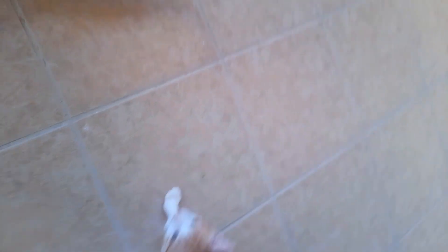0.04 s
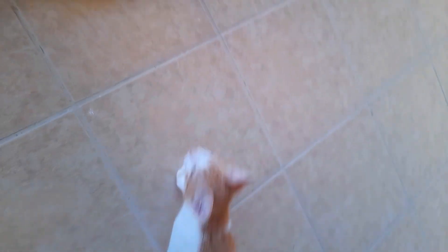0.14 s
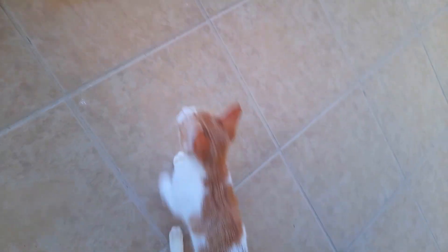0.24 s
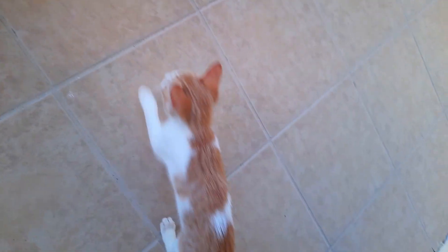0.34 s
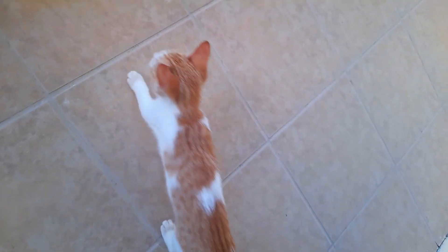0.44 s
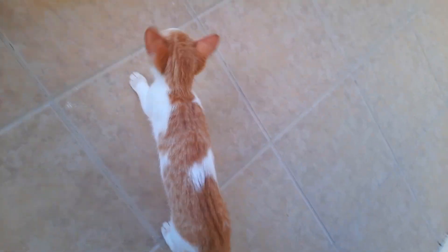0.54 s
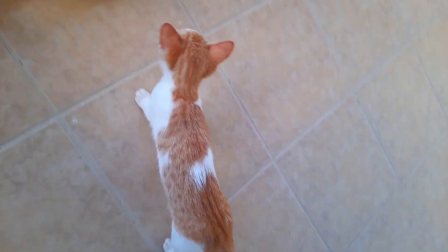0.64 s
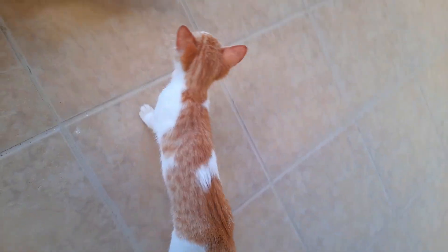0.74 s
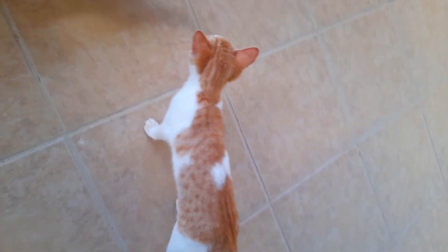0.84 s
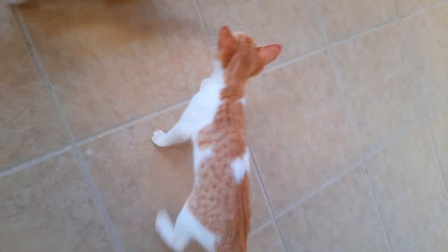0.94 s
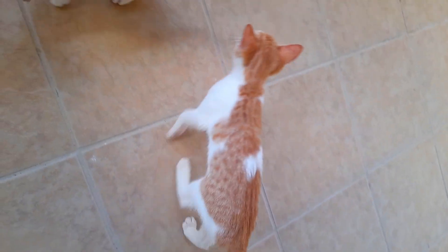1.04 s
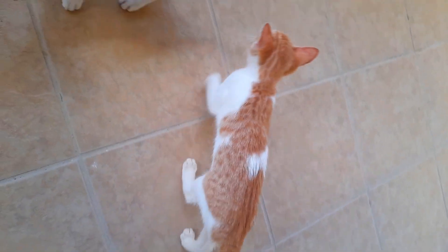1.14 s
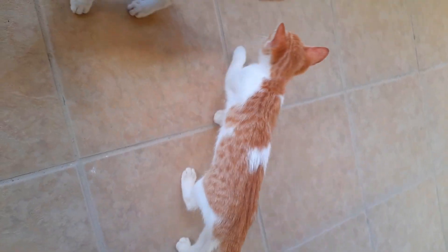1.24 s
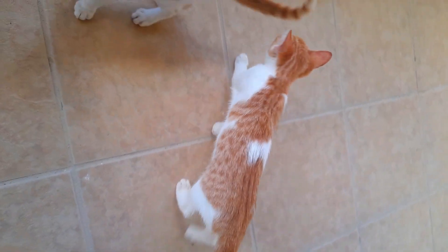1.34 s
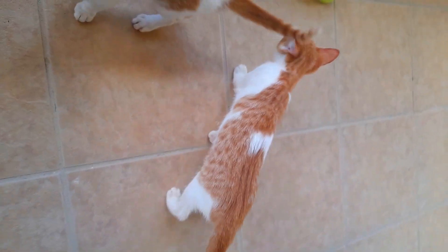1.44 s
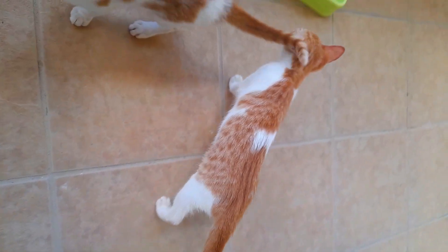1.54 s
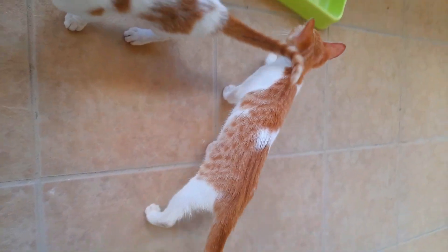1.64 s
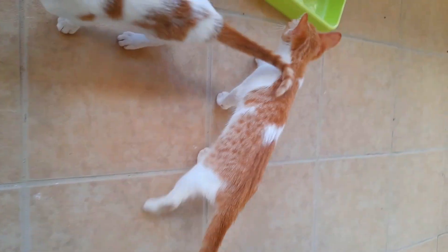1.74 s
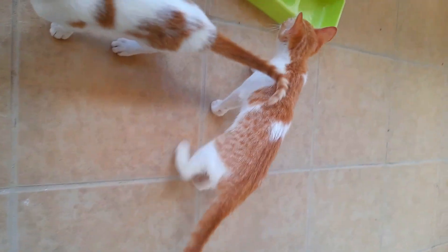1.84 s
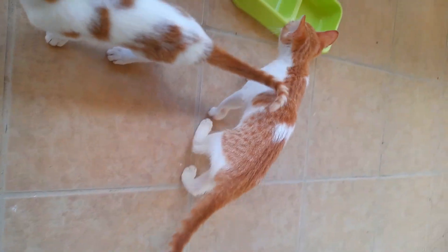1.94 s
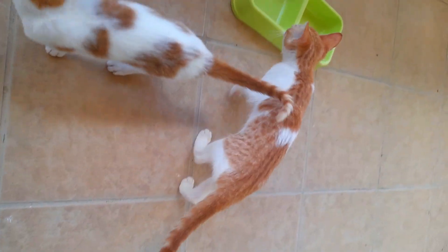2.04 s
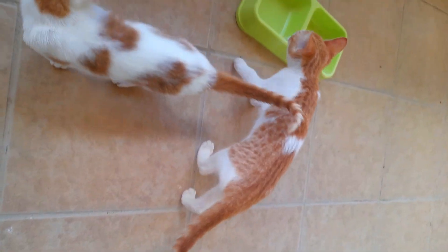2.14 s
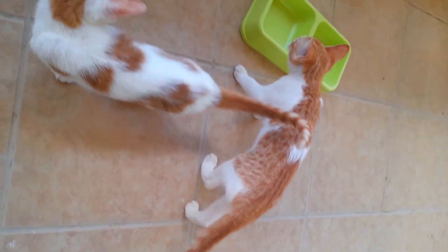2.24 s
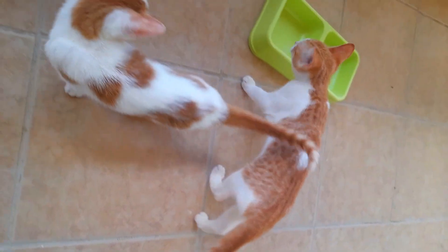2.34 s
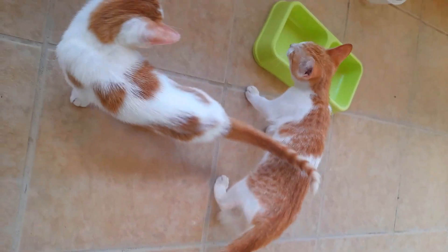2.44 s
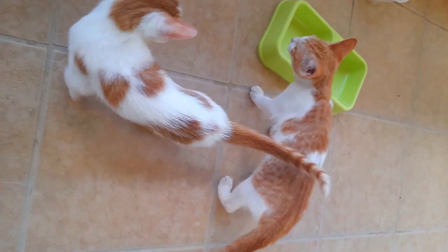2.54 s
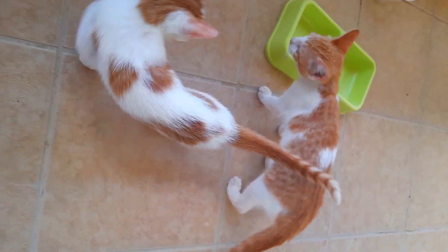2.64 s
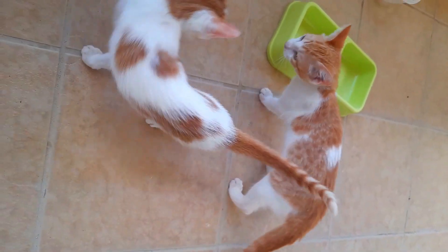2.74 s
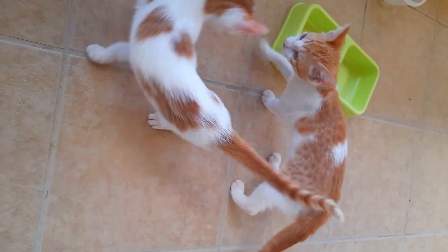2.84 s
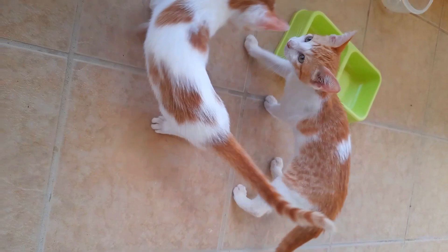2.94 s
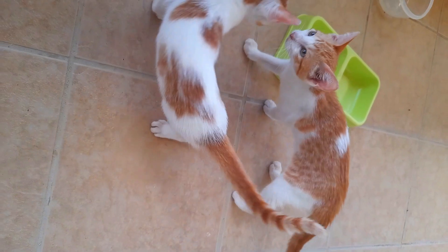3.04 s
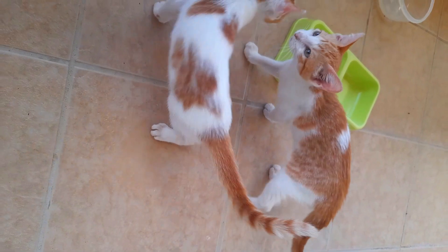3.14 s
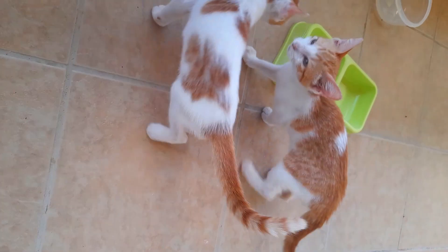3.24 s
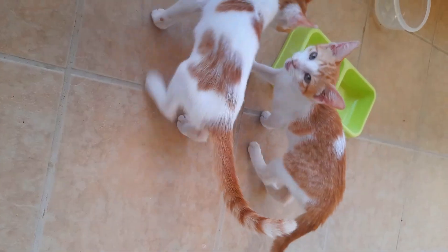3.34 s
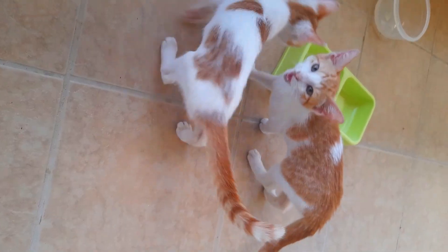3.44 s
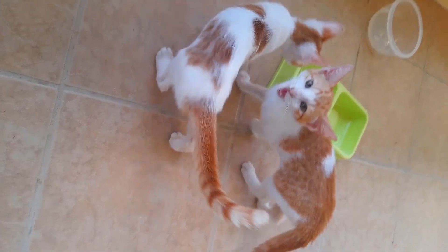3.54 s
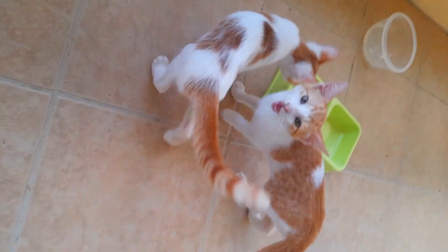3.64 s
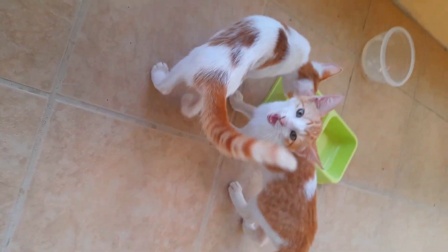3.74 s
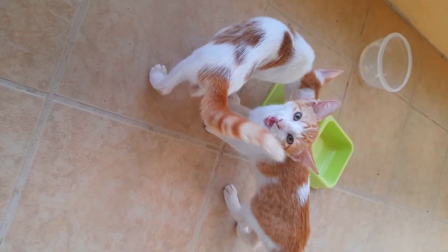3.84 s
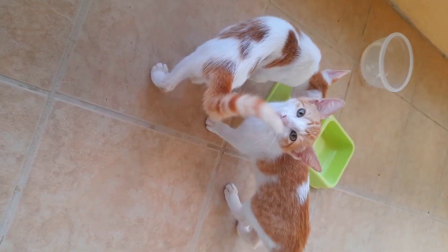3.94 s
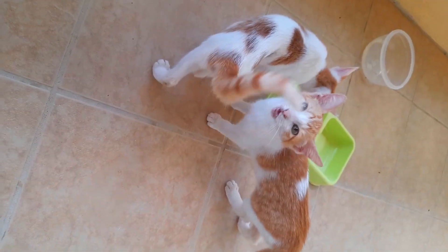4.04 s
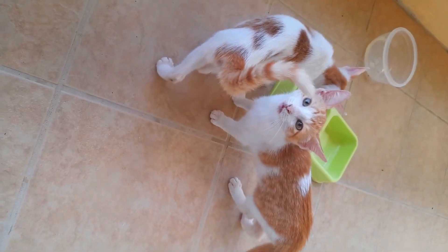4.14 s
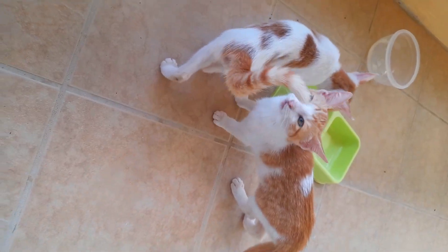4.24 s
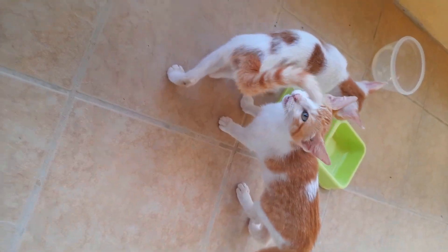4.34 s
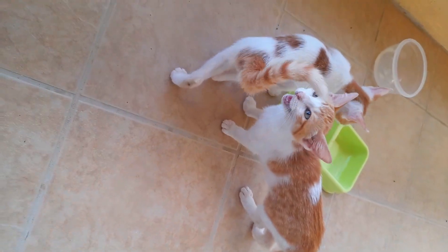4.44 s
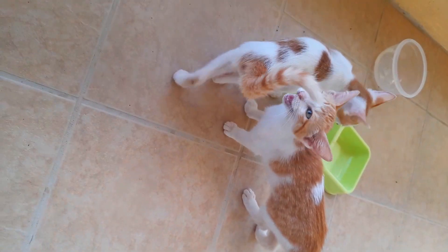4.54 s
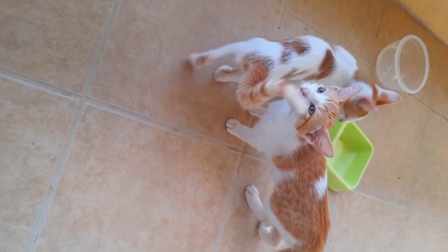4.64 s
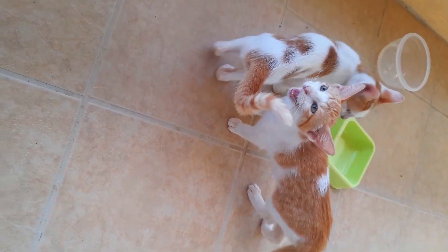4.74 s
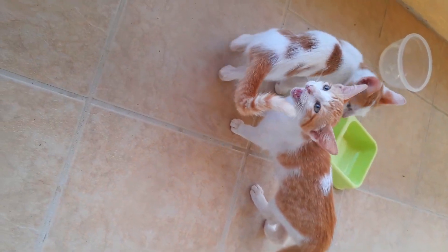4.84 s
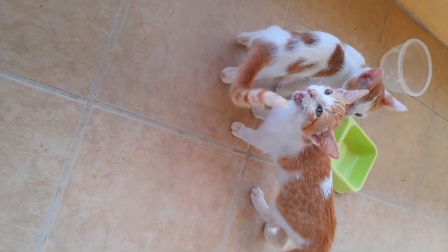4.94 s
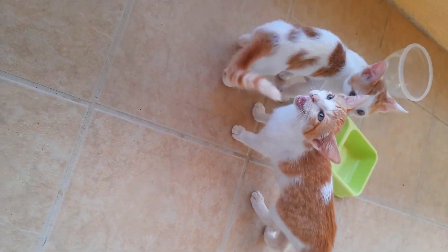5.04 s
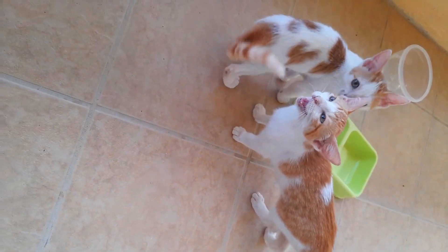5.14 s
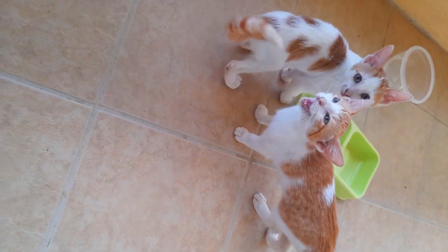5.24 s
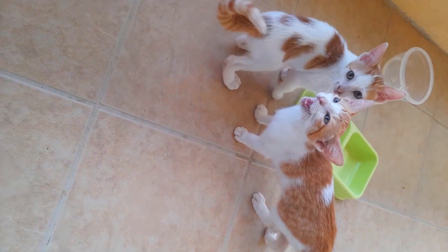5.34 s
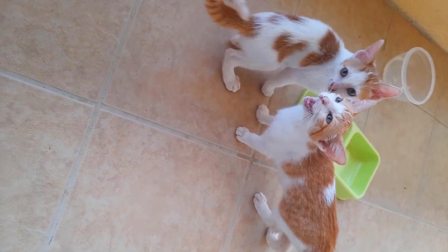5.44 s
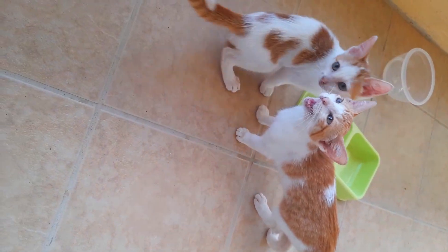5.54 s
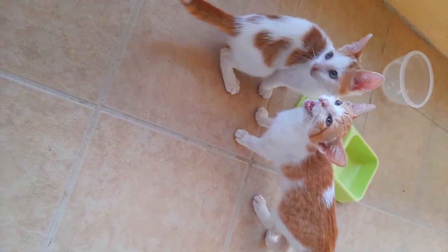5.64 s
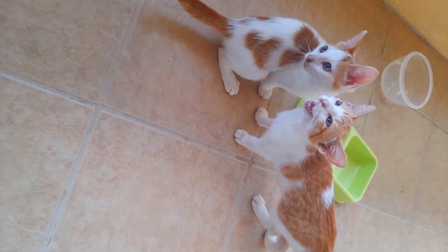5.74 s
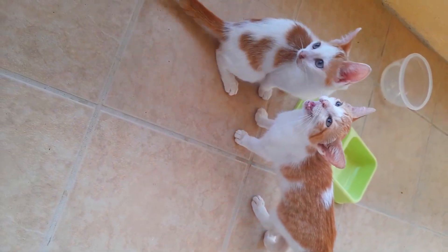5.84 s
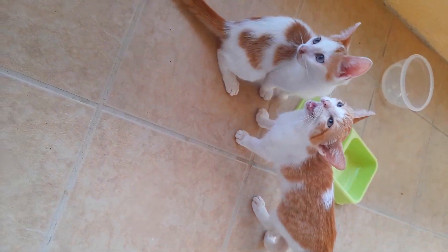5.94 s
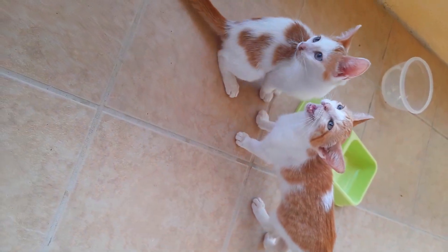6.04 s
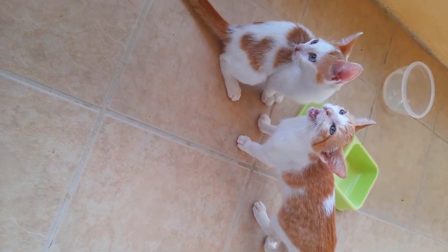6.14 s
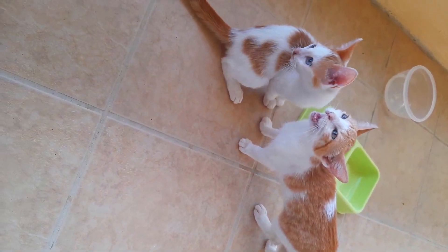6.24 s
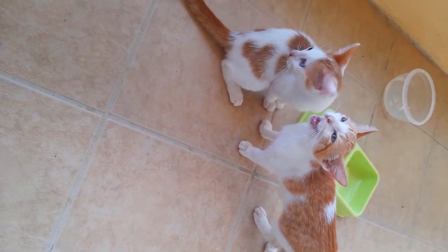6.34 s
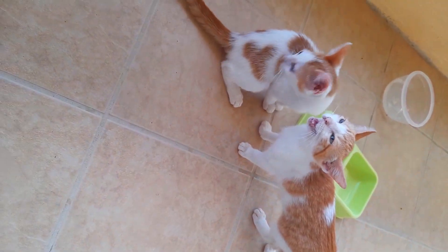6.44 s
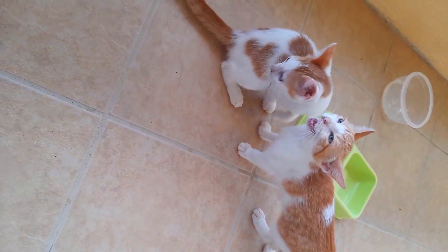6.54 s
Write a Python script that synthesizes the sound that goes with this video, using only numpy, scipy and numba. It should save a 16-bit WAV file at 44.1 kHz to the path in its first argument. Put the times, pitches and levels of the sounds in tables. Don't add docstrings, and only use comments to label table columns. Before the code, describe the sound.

A quick scratchy scamper on tile opens the scene, followed by a creaky onset and an arching mew. A piercing squeak from another kitten flips and breaks, ending in tiny peeps. Quiet rumble and faint breath fill the gap. Another short mew follows, dropping abruptly, then the loudest begging cry swells, narrows as the mouth closes, and is still sounding at the end with a ragged whistle over it. Bright small-room echoes, stereo phone pickup.

```python
import sys
import numpy as np
from scipy import signal
from scipy.fft import rfft, irfft
from scipy.io import wavfile
from scipy.ndimage import uniform_filter1d
from numba import njit

SR = 44100
rng = np.random.default_rng(int(sys.argv[2]) if len(sys.argv) > 2 else 0)


def convert_level_to_amplitude(level_db):
    exponent = np.asarray(level_db, float) / 20
    return 10 ** exponent


def transcribe(signal):
    frames = np.atleast_2d(signal).T
    limited = np.clip(frames, -1, 1)
    pcm = np.round(limited * 32767).astype(np.int16)
    wavfile.write(sys.argv[1], SR, pcm)


N = 289737
TIME = np.arange(N) / SR
PORT_LAG = 10


def along(table, quiet=None):
    s, *columns = np.transpose(table)
    return [np.interp(TIME, s, c, quiet, quiet) for c in columns]


def shape(points, hz):
    f, db = np.transpose(points)
    return np.interp(np.log(np.maximum(hz, 1)), np.log(f), db, left=db[0] + 1)


def hiss(points, size=N):
    gain = convert_level_to_amplitude(shape(points, np.arange(size // 2 + 1) * SR / size))
    x = irfft(rfft(rng.standard_normal(size)) * gain, size)
    return x / x.std()


def walk(rate, size=N):
    hold = max(int(SR / rate), 1)
    steps = np.repeat(rng.standard_normal(size // hold + 1), hold)
    return 1.478 * uniform_filter1d(uniform_filter1d(steps, hold), hold)[:size]


def pair(x, pan_db):
    left = (x * convert_level_to_amplitude(pan_db / 2))[:-PORT_LAG]
    return np.array([np.r_[np.zeros(PORT_LAG), left], x * convert_level_to_amplitude(-pan_db / 2)])


def port_hiss(points, shared, own):
    common = hiss(points)
    return np.array([shared * common + own * hiss(points) for _ in range(2)])


# time in seconds, rumble in
# dB.
RUMBLE_LEVEL = [(0, -68.5), (1.2, -67), (1.6, -62.5), (1.95, -70.5), (2.2, -59.5), (2.5, -71.5), (3.4, -71.5),
                (3.63, -62.5), (3.75, -70), (4.05, -63.5), (4.3, -75), (4.6, -67.5), (6.2, -64), (6.57, -63.5)]
# centre in seconds, length in seconds, deep rumble gain in dB.
SWAYS = [
    (.47, 0.27, 10.5),
    (1.804, 0.14, 10.5),
    (6.5, 0.24, 3),
]
# frequency in Hz, density in dB per Hz.
DEEP = [(25, -46), (40, -25), (60, -9), (80, -15.5), (95, -44), (120, -90)]
RUMBLE = [(50, -67), (85, -0.5), (115, -5), (211, -14.5), (321, -11), (823, -20.5), (940, -20.5),
          (1200, -26.5), (1560, -21.5), (2640, -120)]


def rumble():
    low_db = along(RUMBLE_LEVEL)[0]
    sway_db = sum(db * np.exp(-((TIME - s) / length) ** 2) for s, length, db in SWAYS)
    deep_db = low_db - 9 + sway_db
    gust_db = 1.5 * walk(8.8)
    deep = port_hiss(DEEP, 0.84, 0.59) * convert_level_to_amplitude(deep_db + gust_db)
    return deep + port_hiss(RUMBLE, 0.72, 0.9) * convert_level_to_amplitude(low_db + gust_db)


# frequency in Hz, density in dB per Hz.
RUSTLE = [(500, -24), (800, -8.5), (1270, -28.5), (1700, -8.5), (2400, -10.5), (3200, -18), (5500, -13),
          (7000, -11), (9000, -21), (12000, -14.5), (15500, -18.5)]
# time in seconds, extra rustle in dB.
RUSTLING = [(0, 2.5), (.2, -3), (.27, 4.5), (.4, -5.5)]


def rustle():
    low_db = along(RUMBLE_LEVEL)[0]
    level_db = -65.5 + (low_db - low_db.mean()) + along(RUSTLING)[0]
    return np.array([hiss(RUSTLE) * convert_level_to_amplitude(level_db + 1.2 * walk(3.7)) for _ in range(2)])


# start in seconds, peak in dB, ring in Hz, left minus right in dB.
TICKS = [
    (0.04, -52.5, 4780, 38),
    (0.11, -43, 5650, 15),
    (0.22, -43.5, 5670, 15),
    (0.2562, -38.5, 6140, 19),
    (0.28, -31.5, 6900, 18.5),
    (0.2992, -38.5, 1220, 9),
    (0.3496, -43, 7000, 10),
    (3.7604, -27.5, 2700, 13),
    (4.374, -57, 2430, 34),
]


def claws():
    out, t = np.zeros((2, N)), TIME[:1500]
    for s, peak_db, ring_hz, pan_db in TICKS:
        crack = rng.standard_normal(len(t)) * 0.31 * np.minimum(t / 0.0019, 1) * np.exp(-t / 0.0024)
        crack = crack - uniform_filter1d(crack, size=24)
        ring = 0.23 * np.sin(2 * np.pi * ring_hz * t) * np.exp(-t / 0.0011)
        i = int(s * SR)
        out[:, i:i + len(t)] += pair(convert_level_to_amplitude(peak_db) * (crack + ring), pan_db)
    return out


# time in seconds, pitch in Hz, level in dB.
HUM = [(0.05, 238.9, -73.5), (0.746, 245, -74.5), (1.168, 247, -67.5), (1.55, 240.6, -79.5)]


def hum():
    hz, level_db = along(HUM)[0], along(HUM, quiet=-120)[1]
    return np.sqrt(2) * convert_level_to_amplitude(level_db + 2.5 * walk(12.6)) * np.sin(2 * np.pi * np.cumsum(hz) / SR)


def overtone_levels(hz, level_db, throat_hz, bright_db, opening, wide, narrow, folds_db):
    throat_octaves = 0.16
    chest_lag_db = 0.41 * (-55 - level_db)
    low_hz = np.arange(1, 4)[:, None] * hz
    low = convert_level_to_amplitude(folds_db)[:, None] ** 2 / (1 + (np.log2(low_hz / throat_hz) / throat_octaves) ** 2)
    low[0] *= convert_level_to_amplitude(2 * chest_lag_db)
    low_db = 10 * np.log10(low / low.sum(axis=0))
    high_hz = np.arange(4, int(15500 / hz.min()) + 2)[:, None] * hz
    mouth_db = opening * shape(wide, high_hz) + (1 - opening) * shape(narrow, high_hz)
    mouth_db = np.where(high_hz < 15500, mouth_db, -99)
    return level_db + np.vstack([low_db, mouth_db - mouth_db.max(axis=0) + bright_db])


# time in seconds, opening from 0 narrow to 1 wide.
OPENING = [(5.0, 0.87), (5.5, 0.59), (5.75, 0.28), (6.1, 0.04)]
# time in seconds, left minus right in dB.
PLACE = [(0.5, 0), (2.1, 1.5), (2.33, 7), (3.54, -2), (5.35, -1.5), (5.8, 1), (6.57, 4)]
# frequency in Hz, density in dB per Hz.
BREATH = [(700, -15), (1500, -8), (2900, 2), (3700, -4), (4900, -2), (7000, -19), (10300, -7), (15500, -15)]


def voice(table, wide, narrow, jitter, tremor, shimmer_db, flutter_db, throat_hz=0, bright_db=0, leak_db=0,
          folds_db=(0, 0, 0), rasp=0):
    span = slice(int(table[0][0] * SR), min(int(table[-1][0] * SR), N))
    t = TIME[span]
    size = len(t)
    columns = [c[span] for c in along(table)]
    hz, level_db, throat_hz, bright_db = (columns + [throat_hz, bright_db])[:4]
    opening = np.clip(along(OPENING)[0][span], 0, 1)

    unlocked = rasp * np.exp(-((t - t[0]) / 0.17) ** 2 / 2)
    breath_db = np.minimum(-20 + leak_db - 1.15 * (level_db + 55), -12)
    breath = convert_level_to_amplitude(breath_db + 2 * unlocked)

    wobble = jitter * (1 + 6 * breath + 4 * unlocked) * walk(300, size) + tremor * walk(25, size)
    phase = 2 * np.pi * np.cumsum(hz * (1 + wobble)) / SR

    db = overtone_levels(hz, level_db, throat_hz, bright_db, opening, wide, narrow, folds_db)
    tone = 0
    for k, overtone_db in enumerate(db):
        swell = convert_level_to_amplitude(overtone_db + shimmer_db * walk(18.01, size))
        tone = tone + swell * np.sin((k + 1) * phase + k * k)

    bright_power = np.sum(convert_level_to_amplitude(db[3:]) ** 2, axis=0)
    effort = np.sqrt(bright_power + 0.15 * np.sum(convert_level_to_amplitude(db[1:3]) ** 2, axis=0))
    puffs = (1 + 0.2 * np.sin(phase)) * hiss(BREATH, size) * effort * breath * convert_level_to_amplitude(12)

    cut_off = span.stop == N
    edge = np.clip(np.minimum((t - t[0]) / 0.004, (t[-1] + cut_off - t) / 0.01), 0, 1)
    call = (np.sqrt(2) * tone + puffs) * edge * convert_level_to_amplitude(flutter_db * walk(119.56, size))
    out = np.zeros((2, N))
    out[:, span] = pair(call, along(PLACE)[0][span])
    return out


def notes(rows, fade_db, mouth, **sound):
    attack_s, out = 0.012, 0
    for s, length, first_hz, last_hz, db in rows:
        top_hz = first_hz + (last_hz - first_hz) * attack_s / length
        table = [(s, first_hz, db - 4), (s + attack_s, top_hz, db), (s + length, last_hz, db - fade_db)]
        out = out + voice(table, mouth, mouth, **sound)
    return out


RASPING = dict(jitter=0.012, tremor=0.012, shimmer_db=3, flutter_db=3.5)
# frequency in Hz, level in dB.
FIRST_MOUTH = [(1530, -16), (2500, 8.5), (3430, -0.5), (4100, -12), (5200, -7.5), (8000, -23.5),
               (10300, -23.5), (15500, -44)]
# start in seconds, length in seconds, first pitch in Hz, last pitch in Hz, level in dB.
CREAKS = [
    (.512, .12, 674, 777, -52.5),
    (.62, 0.09, 670, 659, -59),
]
DROPS = [
    (1.527, .1, 472, 467, -51),
    (3.997, .085, 597, 530, -45),
]
PEEPS = [
    (2.246, .06, 830, 786, -56),
    (3.304, .035, 940, 985, -61),
    (4.328, .07, 955, 1000, -63),
    (2.15, .08, 2870, 2730, -58),
]


def call_edges():
    creaky = dict(jitter=0.004, tremor=0.006, shimmer_db=2.5, flutter_db=2.2)
    creaks = notes(CREAKS, 3.0, FIRST_MOUTH, throat_hz=1630, bright_db=-6, folds_db=(-8, 0.1, 0.1), **creaky)
    drops = notes(DROPS, 20, FIRST_MOUTH, throat_hz=850, bright_db=-16, leak_db=9, folds_db=(9, 0, 5), **RASPING)
    peeps = notes(PEEPS, 17, FIRST_MOUTH, throat_hz=610, bright_db=-73, leak_db=-26,
                  folds_db=(0.1, -20, -20), **creaky)
    return creaks + drops + peeps


# frequency in Hz, level in dB.
WIDE_MOUTH = [(2800, 3.5), (3300, -7.5), (3900, -0.5), (5000, -4.5), (6300, -7), (7800, -15.5),
              (10000, -15), (15500, -22)]
NARROW_MOUTH = [(2300, 7.5), (3000, -10.5), (3700, -5.5), (4500, -11.5), (5500, -32.5), (7000, -41.5),
                (9800, -24), (15500, -36)]
# time in seconds, pitch in Hz, level in dB, throat resonance in Hz, brightness in dB.
FIRST_MEW = [(0.69, 834, -56.5, 1970, -11), (0.76, 865.2, -49.5, 1860, -11.5),
             (1.044, 823.5, -52.5, 2000, 0), (1.07, 824.3, -42.5, 1995, -12.5),
             (1.186, 768, -55, 1640, -4.5), (1.22, 758, -56, 1900, -7), (1.434, 620.7, -45, 1750, -14),
             (1.51, 551, -57.5, 1822, -11.5), (1.53, 510.9, -49, 1930, -4)]
SECOND_MEW = [(3.35, 479, -70.5, 1320, -12), (3.398, 494.5, -67, 1173, -5), (3.454, 649, -56.5, 1460, -7.5),
              (3.586, 845.3, -59, 2100, -1.5), (3.614, 831, -61.5, 2180, -4.5),
              (3.672, 871.7, -52.5, 2218, -8), (3.872, 800.7, -51.5, 1780, -7),
              (3.986, 705, -47.5, 2270, -15), (4.0, 722.3, -51, 2000, 12)]
# time
# in seconds, pitch in Hz, level in dB, throat resonance in Hz, brightness in dB.
LAST_MEW = [(4.425, 565, -61.5, 1300, -2.5), (4.5, 707.3, -61.5, 1590, -4),
            (4.68, 821.8, -56, 2400, -3.5), (4.8, 857, -51.5, 2130, -6.5),
            (5.0, 820.2, -47.5, 2470, -6), (5.2, 769.8, -46.5, 1850, -5.5),
            (5.31, 762, -38.5, 2090, -12), (5.5, 744.7, -40, 2150, -9), (5.6, 694, -33, 2090, -15.5),
            (5.73, 651, -38.5, 2020, -6.5), (5.81, 644.6, -28, 1980, -14.5),
                    (5.87, 642.3, -35, 1900, -12), (6.089, 625.8, -30, 1950, -12.5),
                    (6.125, 614, -44, 1640, 0.5), (6.22, 602.6, -37.5, 1600, -4.5),
                    (6.31, 597.6, -32, 1680, -9), (6.39, 593.5, -41.5, 1280, -1),
                    (6.57, 586.8, -40.5, 1450, -2)]


def mews():
    steady = dict(jitter=0.0017, tremor=0.0012, shimmer_db=1.6, flutter_db=1.0)
    first = voice(FIRST_MEW, FIRST_MOUTH, FIRST_MOUTH, folds_db=(0.1, 0.1, 5), **steady)
    second = voice(SECOND_MEW, WIDE_MOUTH, NARROW_MOUTH, leak_db=6.5, rasp=0.95, folds_db=(6, 0.1, 2.5), **steady)
    last = voice(LAST_MEW, WIDE_MOUTH, NARROW_MOUTH, rasp=1,
                 folds_db=(9, 0.1, 0.1), **steady)
    tremble_hz = 30
    tremble_db = 4 * np.exp(-((TIME - 5.64) / 0.075) ** 2) * np.cos(2 * np.pi * tremble_hz * (TIME - 5.632))
    return first + second + last * convert_level_to_amplitude(tremble_db)


# frequency in Hz, level in dB.
SQUEAK_MOUTH = [(4500, -4), (6300, 2), (7700, -6.5), (9500, -7.5), (11500, -14), (13400, -16), (15500, -17)]
# time in seconds, pitch in Hz, level in dB.
SQUEAK = [(1.545, 1720, -51), (1.6, 1875, -51.5), (1.685, 1931, -53), (1.72, 1933, -60.5),
          (1.78, 1945, -52), (1.91, 1885, -54.5), (1.94, 1920, -66), (1.98, 1910, -51.5),
          (2.055, 1822, -51)]
SQUEAK_END = [(2.065, 1706, -57.5), (2.117, 1733, -50), (2.19, 1631, -51), (2.27, 1544, -61)]
FLIPS = [
    (1.687, 0.15, 1646, 1525, -43),
    (1.919, .11, 1585, 1580, -42),
    (2.052, 0.034, 1610, 1550, -51),
]
BREAKS = [
    (1.69, .07, 1850, 1780, -54),
    (1.935, .085, 1690, 1720, -58),
]


def squeak():
    trembling = dict(jitter=0.004, tremor=0.004, shimmer_db=4, flutter_db=2.2)
    broken = dict(jitter=0.008, tremor=0.005, shimmer_db=2, flutter_db=2.2)
    cracked = dict(throat_hz=1900, bright_db=-15.5, leak_db=8.5, folds_db=(0.1, -2, -5), **RASPING)
    high = voice(SQUEAK, SQUEAK_MOUTH, SQUEAK_MOUTH, throat_hz=2150, bright_db=-16,
                 folds_db=(0.1, 0.1, 0.1), **trembling)
    flips = notes(FLIPS, 30.3, SQUEAK_MOUTH, throat_hz=3240, bright_db=-19.5, folds_db=(0.1, 0.1, -10), **broken)
    breaks = notes(BREAKS, 6.1, SQUEAK_MOUTH, **cracked)
    return high + flips + breaks + voice(SQUEAK_END, SQUEAK_MOUTH, SQUEAK_MOUTH, **cracked)


# time in seconds, level in dB.
WHEEZE = [(2.3, -76), (2.4, -80), (2.7, -77), (2.9, -73.5), (3.2, -82), (3.35, -109)]
# frequency in Hz, density in dB per Hz.
WHEEZE_TONE = [(1500, -32), (1750, 0.5), (2000, -19), (4500, -10), (5200, 2), (5550, -1), (5900, 4.5),
               (6400, -20), (7000, -60)]


def wheeze():
    return port_hiss(WHEEZE_TONE, 0.44, 0.96) * convert_level_to_amplitude(along(WHEEZE, quiet=-120)[0])


# time in seconds, pitch in Hz, level in dB.
WHISTLE = [(6.28, 4050, -62), (6.33, 4430, -53), (6.4, 4560, -50), (6.48, 4560, -49), (6.57, 4150, -50)]


def whistle():
    hoarse = dict(jitter=0.026, tremor=0.003, shimmer_db=1, flutter_db=1.5)
    return voice(WHISTLE, SQUEAK_MOUTH, SQUEAK_MOUTH, throat_hz=4300, bright_db=-46,
                 folds_db=(0.1, -25, 0.1), **hoarse)


@njit
def walls(x, lags, gain, damp):
    line, soft, out = np.zeros((8, 4096)), np.zeros(8), np.zeros((2, len(x)))
    for i in range(len(x)):
        total = 0.
        for k in range(8):
            soft[k] += (1 - damp) * (gain[k] * line[k, (i - lags[k]) & 4095] - soft[k])
            total += soft[k]
            out[k % 2, i] += soft[k]
        for k in range(8):
            line[k, i & 4095] = x[i] + soft[k] - total / 4
    return out


def room_tail(mono):
    t60_s = 0.28
    lags = rng.integers(500, 2200, 8)
    return convert_level_to_amplitude(-11) * walls(mono + 1e-18, lags, convert_level_to_amplitude(-60 * lags / SR / t60_s), 0.017)


# left delay in ms, right delay in ms, level in dB.
ECHOES = [(2.3, 2.35, -8), (4.1, 4.7, -8), (7.9, 9.1, -10), (13.0, 12, -2.5)]


def echoes(mono):
    out = np.zeros((2, N))
    for left_ms, right_ms, db in ECHOES:
        for ear, ms in enumerate((left_ms, right_ms)):
            lag = int(ms * SR / 1000)
            out[ear, lag:] += convert_level_to_amplitude(db) * mono[:-lag]
    return out


def scene():
    air = (rumble() + rustle() + wheeze()) * convert_level_to_amplitude([[2.1], [-2.1]]) + hum()
    near = claws() + call_edges() + mews() + squeak() + whistle()
    mono = (near[0] + np.roll(near[1], PORT_LAG) * (TIME > 0.001)) / 2
    return near * convert_level_to_amplitude(-2.0) + echoes(mono) + room_tail(mono) + air


def low_pass(x):
    return signal.sosfilt(signal.butter(12, 15700, fs=SR, output="sos"), x)


def record(dry):
    return low_pass(dry)


dry = scene()
out = record(dry)
transcribe(out)
```